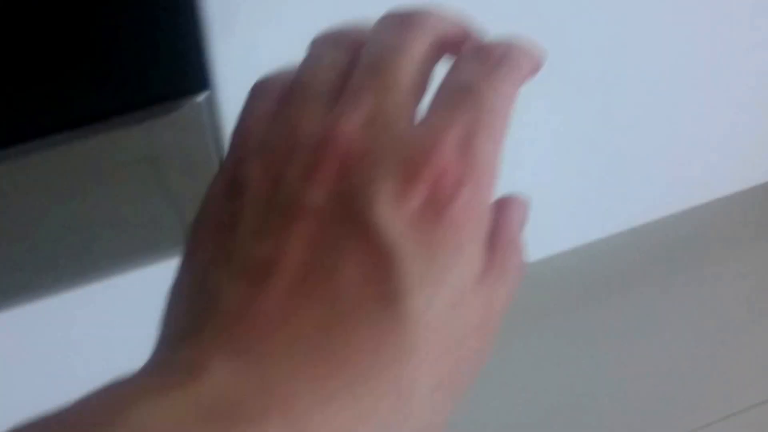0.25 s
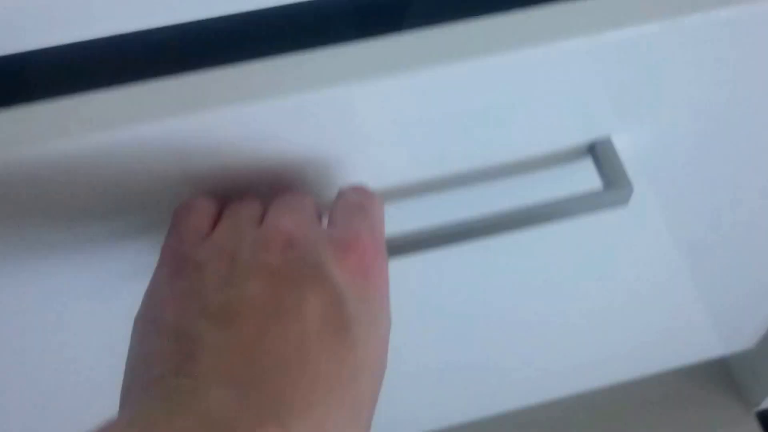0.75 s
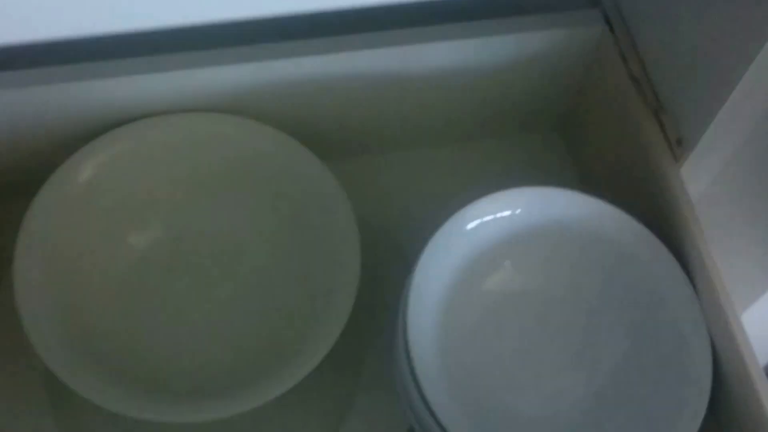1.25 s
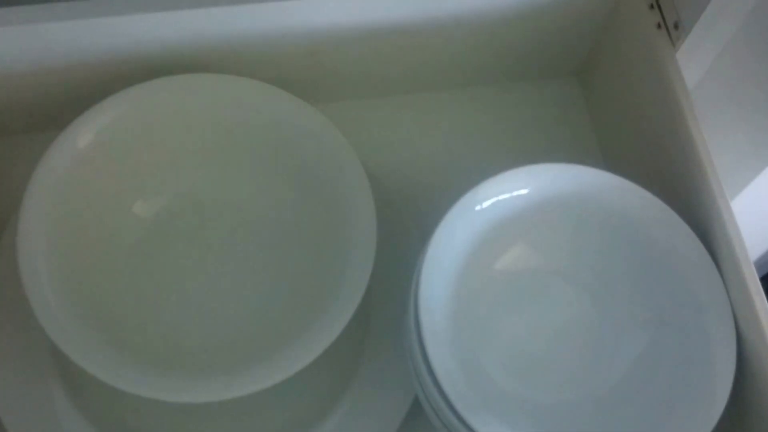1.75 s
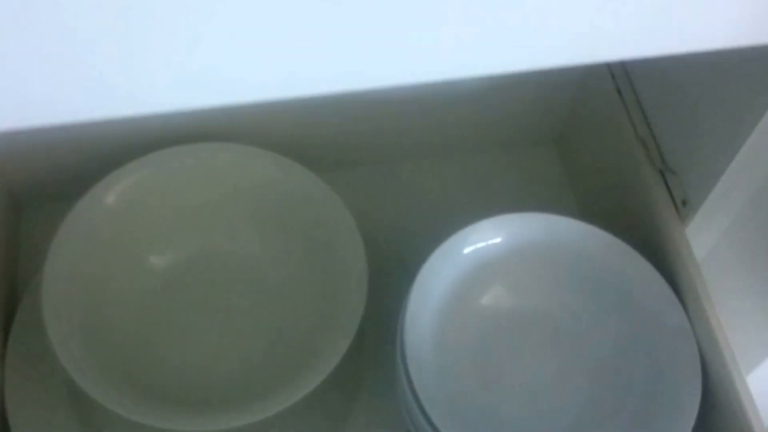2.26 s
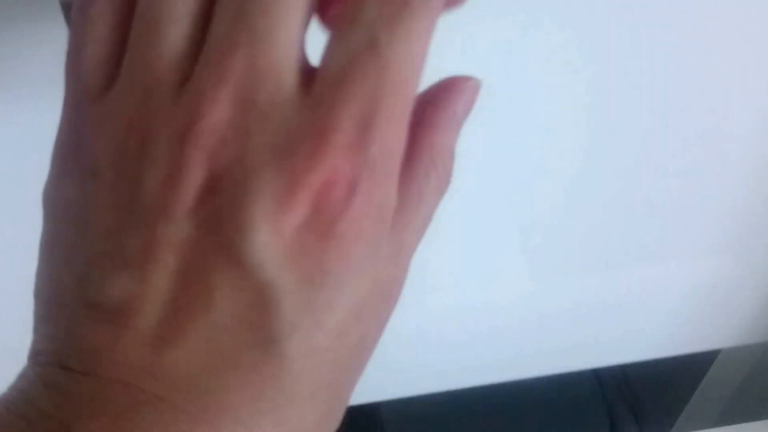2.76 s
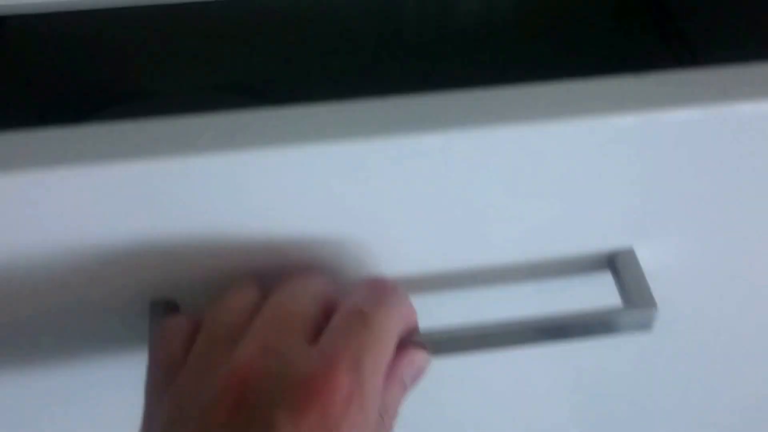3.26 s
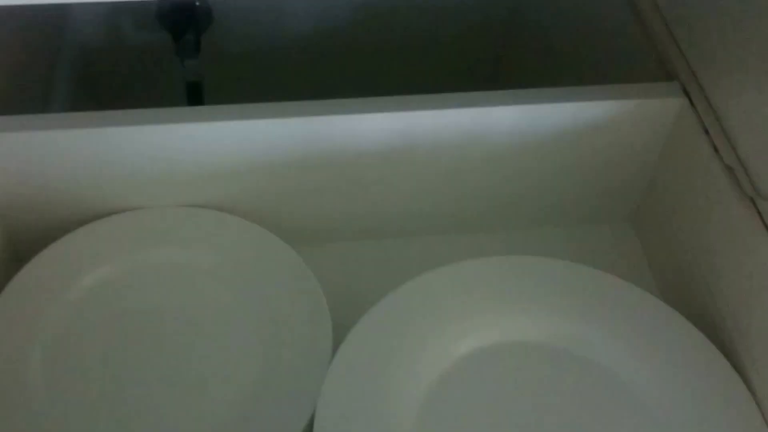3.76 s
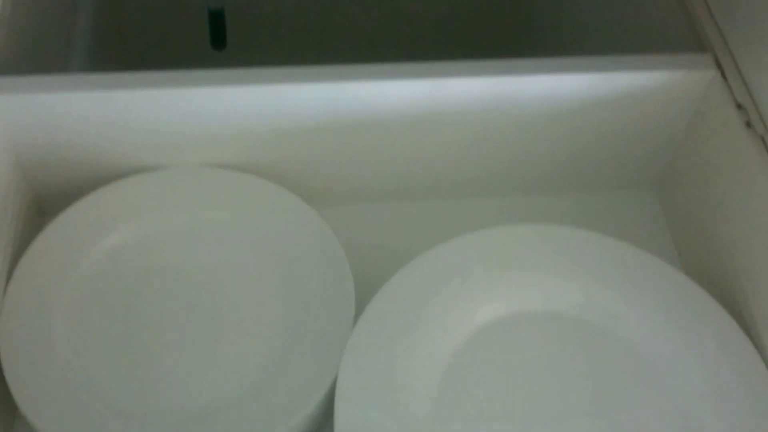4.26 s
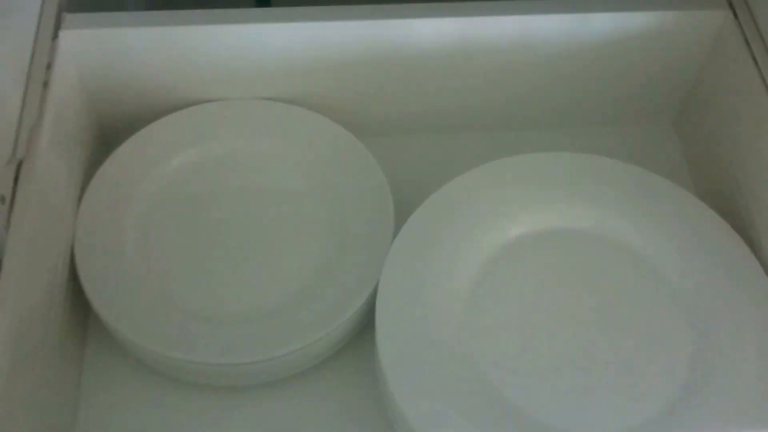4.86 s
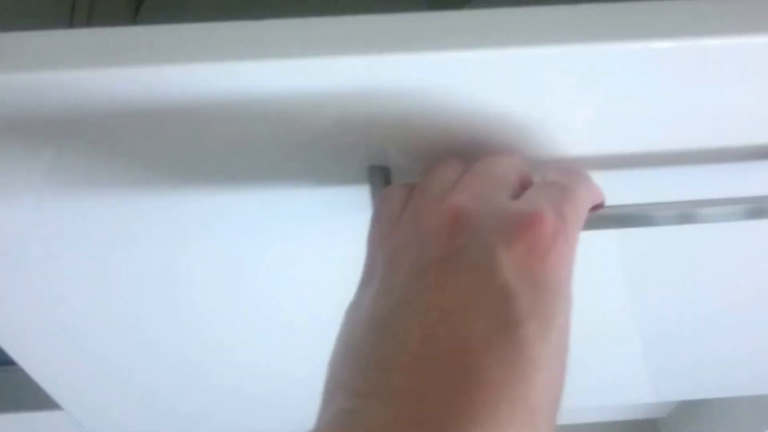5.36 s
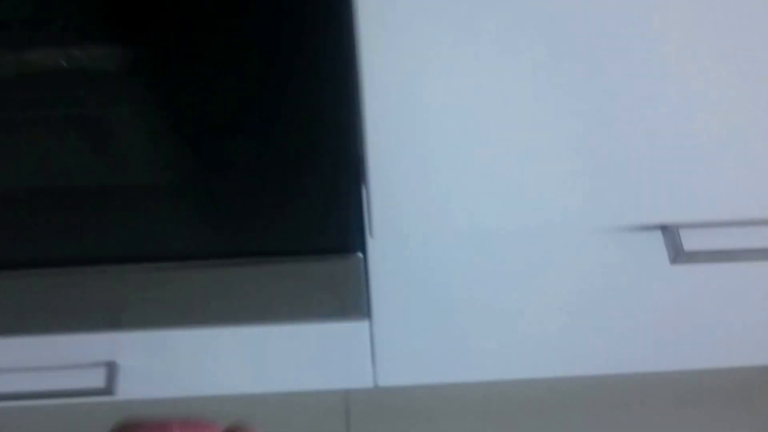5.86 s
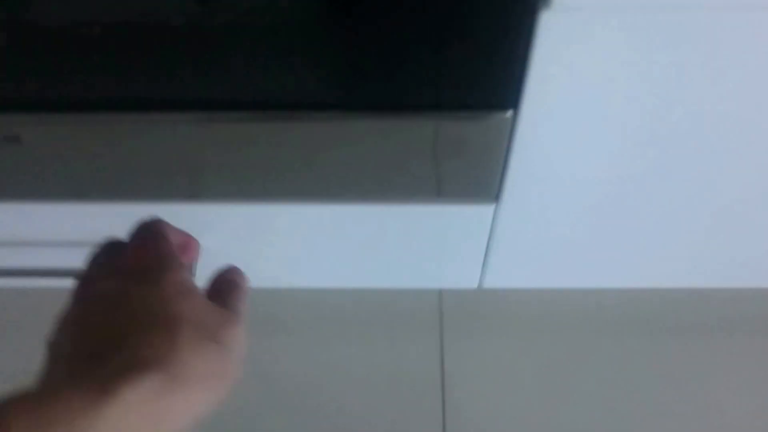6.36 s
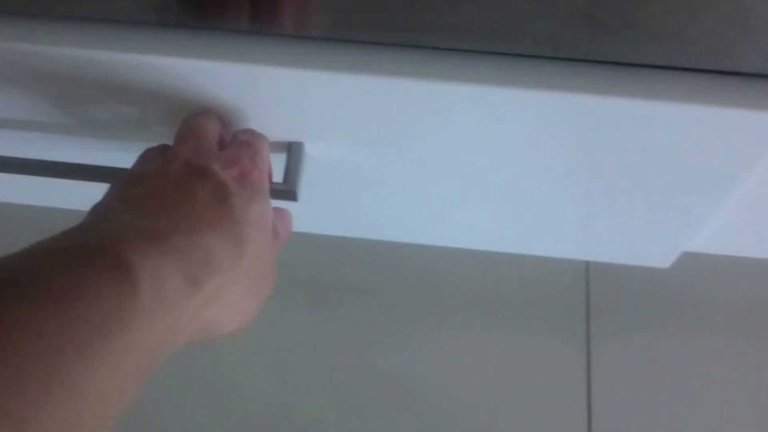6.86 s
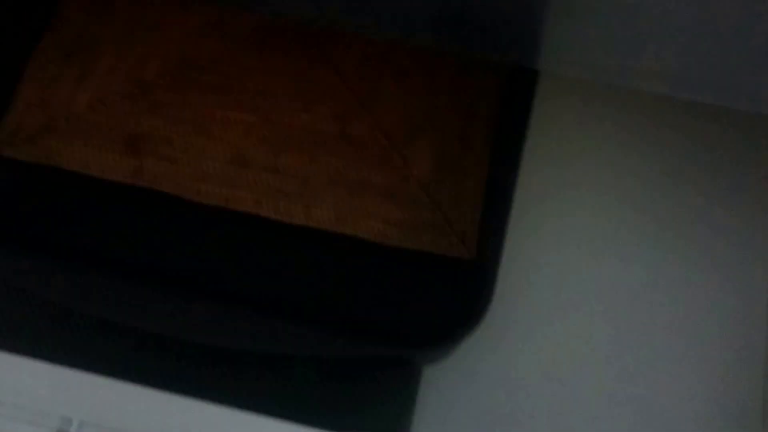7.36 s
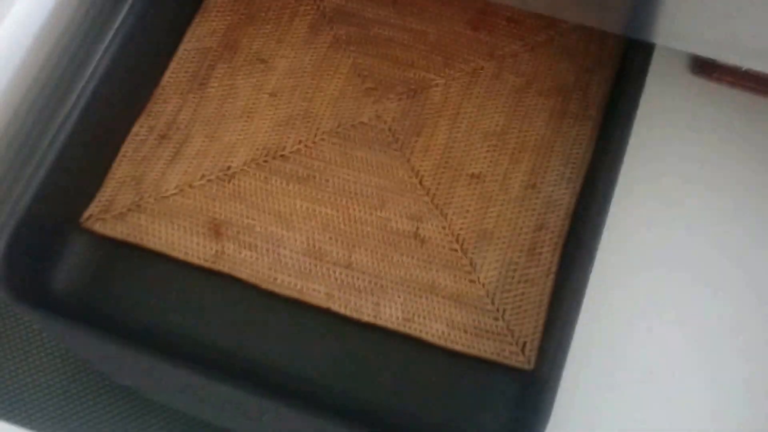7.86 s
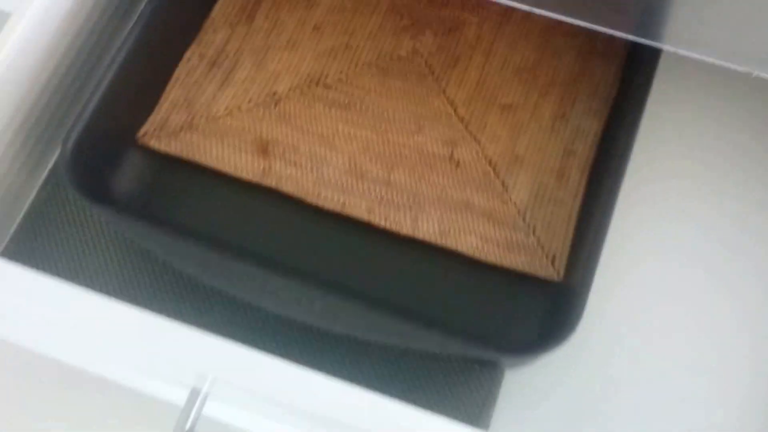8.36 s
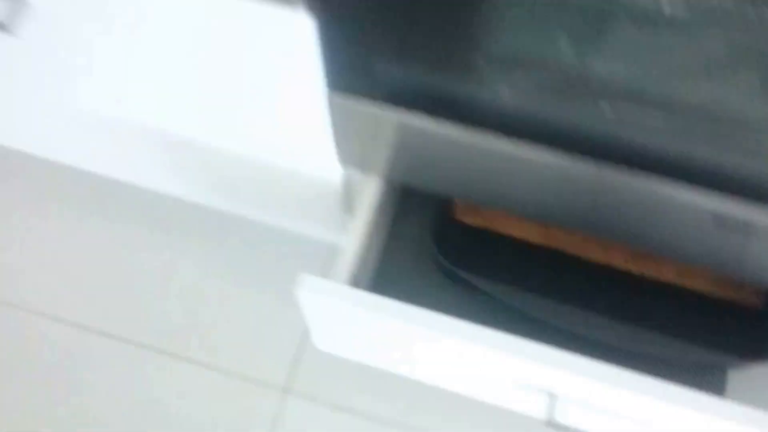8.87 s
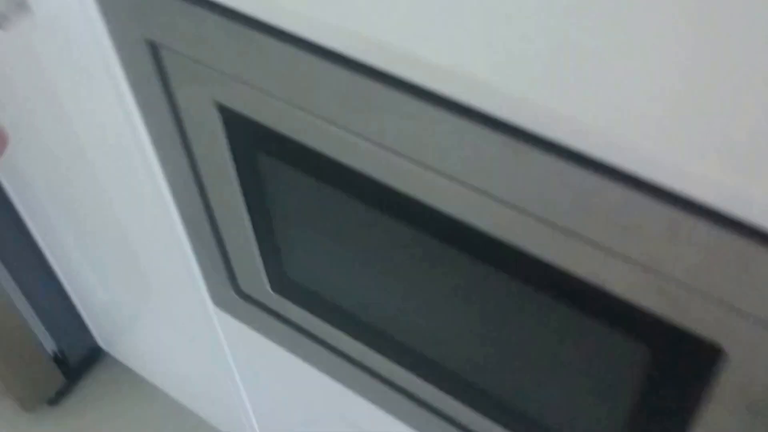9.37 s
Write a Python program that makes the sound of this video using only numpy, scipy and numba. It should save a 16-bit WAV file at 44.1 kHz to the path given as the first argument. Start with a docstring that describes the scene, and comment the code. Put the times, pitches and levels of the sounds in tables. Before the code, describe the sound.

Close, wide stereo pickup of drawers handled one by one: grinding rollers, hollow box rumble, wooden knocks and crockery chinks. Hard bangs fall at the start, near 1.6, 3.2, 6.2 and, less heavily, 9.5 seconds. Between them come softer rolling, clothing rustle and low handling puffs. The room is still, with bright short reverberation and distant fridge hum.

```python
"""From the start, room air and a far fridge hum lie under a drawer rolling on noise-excited resonances.
Blows follow at once, forces shaking modes of carcass, fronts and crockery; tones and a ringing bar join them.
Drawers go on rolling and banging, hardest near 0.1, 1.6, 3.2, 6.2 and 9.5 s; filtered noise rustles as clothes do.
Low puffs strike the microphones directly at 0.2, 2.6 and 9 s. The room is hard and quiet; its two close
microphones are widened, so the bass comes out in opposite phase, and bangs overload them."""
import sys
import numpy as np
from scipy import signal
from scipy.fft import rfft, irfft, next_fast_len
from scipy.io import wavfile
from numba import njit

SR = 44100
rng = np.random.default_rng(int(sys.argv[2]) if len(sys.argv) > 2 else 0)


def transcribe(signal):
    """Save signal, clipped to [-1, 1], as a 16-bit WAV file at the path in sys.argv[1]."""
    frames = np.atleast_2d(signal).T
    limited = np.clip(frames, -1, 1)
    pcm = np.round(limited * 32767).astype(np.int16)
    wavfile.write(sys.argv[1], SR, pcm)


N = 423801   # samples
PAD = next_fast_len(N + SR)   # room for a one-second tail
HZ = np.maximum(np.arange(PAD // 2 + 1) * SR / PAD, 1)

# Room air and far rumble: (frequency [Hz], relative density [dB per Hz])
AIR_SPECTRUM = [(30, -24), (48, -7), (69, -4), (120, -22.5), (182, -24.5), (292, -27.5), (606, -38),
                (2830, -42), (5000, -53.5), (6200, -49.5), (9000, -56.5), (15500, -72)]
AIR_DB = -52
# Sum against difference of the microphones for room air: (frequency [Hz], level [dB])
AIR_SUM_LEVEL = [(30, -18.5), (110, -10), (380, -6), (1300, -1), (15000, 6.5)]
# Fridge compressor: (multiple of the turning rate, level before wavering [dB rms])
HUM_PARTIALS = [(1, -65.5), (2, -68.5), (3, -69), (4, -73.5), (5, -77), (6, -85.5), (7, -86.5)]
HUM_HZ = 87.5   # mean turning rate

# Drawers rolling: (up to speed [s], slowing from [s], carcass rumble [dB], drawer box [dB],
#                   roller grind [dB], chinking load [dB], singing handle [dB], hollow note of the box [Hz])
SLIDES = [(0.0, 0.12, -32, -56.5, -50.5, -73, -72, 255), (0.92, 1.42, -36.5, -32.5, -41, -49.5, -46, 260),
          (2.2, 2.6, -47, -33, -49, -55, -46, 228), (2.75, 2.92, -36, -39, -49, -54.5, -51, 240),
          (3.6, 3.85, -45.5, -30.5, -44.5, -49, -60, 195), (4.98, 5.42, -39.5, -38.5, -50, -55.5, -61, 193),
          (5.55, 5.95, -47, -47, -58, -68, -70, 192), (6.549, 6.944, -51, -64, -67, -65.5, -68, 240),
          (7.15, 7.68, -36.5, -31.5, -47.5, -51.5, -72, 245),
          (7.9, 8.3, -66.5, -64, -66.5, -67.5, -70.5, 230),
          (8.42, 8.95, -43, -36.5, -53.5, -62.5, -73, 190),
          (9.05, 9.5, -41.5, -46.5, -55.5, -66, -70.5, 205)]
SPEED_UP_DB_PER_S, SLOW_DOWN_DB_PER_S = 108, 56
# Bangs jolting a drawer on its rails: (time [s], carcass rumble [dB], drawer box [dB],
#                                       roller grind [dB], chinking load [dB], rustle [dB])
JOLTS = [(0.24, -14.5, -26, -30.5, -50, -30.5), (1.65, -47.5, -19, -22.5, -23.5, -28.5),
         (3.2, -21.5, -20.5, -22, -32, -34.5), (6.248, -21.5, -33.5, -45, -41, -31),
         (9.579, -27.5, -29.5, -27, -38.5, -53.5)]
# Settling after a jolt: (rumble, box, grind, load, rustle [all dB per s])
SETTLE_RATES = (110, 60, 73, 70, 119)
JOLT_RISE_DB_PER_S, JOLT_HOLD_S = 499.5, 0.02
# Roller grind: (frequency [Hz], relative density [dB per Hz])
GRIND_SPECTRUM = [(450, 10), (700, 9.5), (1000, 8), (1300, 3), (1900, -3), (3000, -10), (4300, -23),
                  (6200, -20), (9000, -27), (15500, -57)]
# Handle bar singing while a drawer rolls: (frequency [Hz], relative level [dB], t60 [s])
BAR_MODES = [(440, -0.5, 0.7), (872, -1, .4)]
CHINKS_PER_S, CHINK_DAMPING, CHINK_SOFT_HZ = 120, .4, 2500   # damping multiplies the crockery's t60

# Clothes and skin: (full [s], fading from [s], level [dB])
RUSTLES = [(0.0, 0.098, -51.5), (0.507, 0.707, -61), (1.154, 1.206, -53), (2.383, 2.593, -56.5),
           (2.71, 2.743, -51), (3.573, 3.75, -57), (5.22, 5.336, -66), (5.74, 5.897, -68),
           (6.5, 6.864, -56.5), (7.042, 7.48, -61), (7.652, 7.662, -47.5), (8.38, 8.588, -55),
           (8.7, 8.93, -52.5), (9.262, 9.505, -52.5)]
RUSTLE_RISE_DB_PER_S, RUSTLE_FADE_DB_PER_S = 201.5, 106
# Rustle: (frequency [Hz], relative density [dB per Hz])
RUSTLE_SPECTRUM = [(1200, -12), (2500, 6), (5100, -4.5), (6000, 3.5), (8000, -4), (12000, -14),
                   (15500, -11)]

# Blows, levels relative: (time [s], carcass thud [dB], panel knock [dB], panel pitch struck [Hz], clatter [dB],
#                          clatter tilt to the treble [dB per band], shake length [s], left against right [dB])
BLOWS = [(0.03, -35, -58, 315, -56, -9.5, 0.0049, -8), (0.134, -14, -22, 772, -27, -1, 0.037, 3),
         (0.2058, -26.5, -25, 312, -27.5, -11, 0.0055, 9.5),
         (0.244, -27.5, -36, 759, -29.5, -3.5, 0.076, 3.5), (0.262, -27, -17.5, 594, -25, -7.5, 0.02, 5),
         (0.78, -37, -38, 304, -56, -4, 0.05, 5.5), (0.972, -34.5, -35, 297, -54, -5.5, 0.078, 1.5),
         (1.077, -35, -32.5, 284, -58, -10.5, 0.016, 1), (1.098, -37.5, -26.5, 250, -45.5, -6.5, 0.024, 0),
         (1.13, -31, -30, 282, -34, 3.5, 0.06, 1), (1.311, -43, -31, 318.5, -51.5, -11.5, 0.03, 2.5),
         (1.457, -51.5, -41, 310, -55, -11, 0.007, -4.5), (1.555, -53, -56.5, 300.2, -52, -2, 0.012, -0.5),
         (1.598, -18, -10, 248, -28, -3, 0.089, -0.5), (1.619, -27, -32, 294, -10.5, 1, 0.035, 3.5),
         (1.639, -38.5, -23, 263, -38, -3, 0.009, 4), (1.643, -41.5, -28, 560, -16, -3, 0.025, 2),
         (2.261, -37.5, -28.5, 250, -55.5, -17.5, 0.024, 0.5),
         (2.329, -54, -40.5, 247, -57, 8.5, 0.023, 0.5), (2.394, -48, -36.5, 232, -47.5, -7, 0.0049, 1),
         (2.408, -58, -43.5, 210, -47.5, -1, 0.042, 2), (2.463, -55, -36.5, 231, -44, -7.5, 0.023, -1.5),
         (2.554, -45, -37.5, 172, -43, -1, 0.022, -2), (2.623, -38.5, -33, 239, -47.5, -7.5, 0.013, 3),
         (2.671, -28, -29.5, 234, -33, 0.5, 0.044, 0.5), (3.0867, -48, -18.5, 537.5, -39, -15.5, 0.031, -1),
         (3.127, -36, -36, 354.2, -47.5, -11.5, 0.059, -3), (3.157, -12, -16, 395.2, -13, -5, 0.029, -0.5),
         (3.194, -25.5, -15, 770, -23.5, -12, 0.036, -0.5),
         (3.55, -50.5, -53.5, 179, -45.5, -1.5, 0.034, -1), (3.647, -34, -26, 185.3, -34, -1, 0.014, -0.5),
         (3.664, -50.5, -38.5, 211.3, -34.5, -4.5, 0.037, -2), (3.732, -45, -42, 187.7, -41, -8, 0.028, 1),
         (3.848, -59, -48, 238.4, -53, -7, 0.0125, -2), (3.92, -55.5, -54.5, 242, -59, 1, 0.0066, 3.5),
         (4.128, -47, -39, 237.7, -60, -10, 0.017, -0.5), (5.17, -52.5, -50.5, 192, -52, -3, 0.011, 1),
         (5.201, -33.5, -25.5, 192, -45.5, -6, 0.043, 0), (5.261, -46.5, -40.5, 193.4, -51.5, -1, 0.05, 2),
         (5.747, -58, -60, 192.6, -57.5, 1, 0.008, 1), (5.968, -40.5, -51, 176.6, -63.5, -10, 0.026, -4),
         (6.202, -30.5, -23, 362.4, -28, -7, 0.011, 8.5), (6.208, -8.5, -9, 363, -17.5, -6, 0.02, 0),
         (6.232, -26, -15, 230.1, -21.5, 2, 0.04, -1), (6.733, -58, -65.5, 174, -50.5, 1, 0.016, 2),
         (6.764, -45, -59.5, 172.3, -54, 14.5, 0.027, -3.5), (6.859, -58, -61, 172, -54, -1, 0.0075, -0.5),
         (7.061, -31.5, -47.5, 163, -54, -2.5, 0.029, -0.5),
         (7.32, -31.5, -40.5, 247, -51.5, -5, 0.026, -3), (7.598, -35, -27, 220, -38, -5.5, 0.0093, 1.5),
         (7.632, -43.5, -37, 216, -32.5, 8, 0.0096, 3), (7.665, -54.5, -54.5, 247, -35, 7.5, 0.0087, -1.5),
         (7.704, -33, -61.5, 220, -38.5, 3, 0.0067, 1), (7.972, -67, -39.5, 246, -61.5, 0, 0.017, 0),
         (8.192, -68, -66, 225, -60, -7, 0.021, 0), (8.359, -52.5, -69.5, 235, -55, 1, 0.046, -1.5),
         (8.396, -63, -78, 235, -51.5, 1, 0.014, 0), (8.577, -41.5, -37.5, 262, -48, -3, 0.012, 3),
         (8.648, -59, -33.5, 361.7, -32.5, 5, 0.019, 0.5), (8.676, -55, -36.5, 202, -38.5, 10, 0.015, -3.5),
         (8.78, -37.5, -72, 200, -51.5, 12, 0.0062, 0), (9.232, -49, -52.5, 173, -56, -1, 0.018, -7),
         (9.444, -54, -56, 178, -62, 25, 0.0061, 7.5), (9.534, -29.5, -30, 310, -30, 1, 0.016, 3),
         (9.565, -29.5, -28, 419.7, -35, -4, 0.0125, -3)]
# Carcass modes: (frequency [Hz], relative level [dB], t60 when struck [s])
CARCASS_MODES = [(60, -1, 0.062), (77.4, -8, 0.14), (92, -7, 0.26), (88, 6.5, 0.12), (108.3, 0.5, 0.27),
                 (138, -1, 0.34)]
# Fronts and sides: (frequency [Hz], relative level [dB], t60 when struck [s])
PANEL_MODES = [(181.5, 4.5, 0.26), (220, 0.5, 0.077), (266, -5.5, 0.33), (305, 0, 0.052), (353, 4, 0.053),
               (397, -3, 0.08), (466.6, 3.5, 0.065), (546, -2.5, 0.085), (607, 2.5, 0.11), (728, -9, 0.057),
               (773.3, -2.5, 0.22), (825, -0.5, 0.064)]
# Bowls, plates and trays: (frequency [Hz], relative level [dB], t60 when struck [s])
CROCKERY_MODES = [(1014, -9.5, 0.33), (1154, -17.5, 0.41), (1299, -15.5, .06), (1468, -9.5, .2),
                  (2055, -10.5, 0.23), (1550, -11.5, 0.03), (1730, -3, 0.14), (1773, 0.5, 0.044),
                  (2175, -2, 0.081), (2064, -2, .09), (2347, -0.5, 0.014), (2466, -10, 0.18),
                  (3256, -13, 0.17), (3663, -1, 0.078), (4260, -20.5, 0.022), (4500, -19, 0.049),
                  (4717, -7.5, 0.16), (5840, -15.5, 0.052), (6228, -5.5, .05), (6530, -4, 0.18),
                  (6530, -15, 0.02), (8080, -16, 0.11)]
# Direct crack of a contact: (frequency [Hz], relative density [dB per Hz])
CRACK_SPECTRUM = [(500, -5.5), (800, 0.5), (1300, 1.5), (2100, -4), (2800, 3.5), (4500, -5), (5400, -8),
                  (6400, 0.5), (9000, -12), (12000, -20.5), (15500, -25.5)]
THUD_HZ = 110   # where the carcass is shoved
FIRST_CRACK, CRACK_S = 1.1, .0015   # first contact against the later chatter, and its decay time

# Short held tones: (time [s], length [s], frequency [Hz], level [dB], left against right [dB])
HELD_TONES = [(0.136, 0.052, 963, -19, 4), (0.136, 0.015, 725, -27.5, -12), (0.268, 0.023, 1793, -28, -12),
              (0.269, 0.033, 960, -18, 6), (0.779, 0.025, 320, -25.5, 1.5), (1.634, 0.011, 2134, -12.5, 1),
              (3.0876, 0.026, 536.4, -14, -6.5), (3.097, 0.026, 368, -22, -11.5),
              (3.128, 0.024, 362, -20.5, -6.5)]
TONE_EDGE_S = .005
# Puffs of air or grip on the microphones: (time [s], relative level [dB], frequency [Hz])
PUFFS = [(0.207, -24, 92), (2.537, -21.5, 84.5), (2.588, -29, 80.6), (2.617, -28, 71.6), (2.66, -24, 84),
         (9.041, -35, 92.4), (9.085, -35, 64.4), (9.195, -38.5, 80), (9.543, -30, 72)]
# A bar left ringing: (time [s], frequency [Hz], level [dB], t60 [s])
HANDLE_PARTIALS = [(0.272, 220, -29, 1.6), (0.268, 466.6, -39, 3.4), (0.27, 1061, -43.5, 0.42),
                   (0.27, 1314, -28, 0.68)]

# Reverberation: (frequency [Hz], t60 [s])
ROOM_T60 = [(60, 0.088), (250, 0.18), (700, 0.66), (2000, 0.69), (5000, 0.69), (11000, 0.11)]
ROOM_DB = -8
# Sum against difference of the microphones: (frequency [Hz], level [dB])
SUM_LEVEL = [(30, -25), (60, -19.5), (200, -24.5), (380, -11.5), (700, -14.5), (1290, -5.5), (2400, -0.6),
             (15000, -2.8)]
# The hand shades the left port: (frequency [Hz], level [dB])
LEFT_SHADE = [(250, -0.13), (500, -0.94), (1000, -3), (2000, -3.5), (8000, -3.5), (14000, -1)]
CUTOFF_HZ = 16000


def from_db(db):
    """Logarithmic level: the gain of a level in dB."""
    return 10 ** (np.asarray(db) / 20)


def rms_one(x):
    """Normalisation: a signal scaled to rms 1."""
    return x / np.sqrt(np.mean(x ** 2) + 1e-20)


def at_hz(points, hz):
    """Interpolation: a spectrum table read on a log-frequency axis."""
    table = np.array(points)
    return np.interp(np.log(hz), np.log(table[:, 0]), table[:, 1])


def colour(x, points):
    """Linear filtering through a spectrum, scaled so that white noise keeps its rms."""
    octaves_below = np.maximum(np.log2(points[0][0] / HZ), 0)
    gain = from_db(at_hz(points, HZ) - 24 * octaves_below)
    return irfft(rfft(x, PAD) * rms_one(gain), PAD)[..., :N]


def ring(x, hz, t60):
    """Damped resonance: one mode, which passes white noise of rms 1 at rms 1."""
    r = from_db(-60 / (np.clip(t60, .005, 3) * SR))
    w = 2 * np.pi * hz / SR
    return signal.lfilter([0, np.sin(w) * 2 * np.sqrt(1 - r)], [1, -2 * r * np.cos(w), r * r], x + 1e-18)


@njit
def moving_ring(x, hz, r):
    """Time-varying resonance: its centre (cycles a sample) moves."""
    y = np.zeros(len(x))
    for i in range(2, len(x)):
        y[i] = x[i] + 2 * r * np.cos(2 * np.pi * hz[i]) * y[i - 1] - r * r * y[i - 2]
    return y


def grains(per_s, spread_db):
    """Random impulse process: contacts of uneven size and either sign, rms 1."""
    sizes = from_db(spread_db * np.minimum(rng.exponential(1, N), 4)) * rng.choice([-1, 1], N)
    return rms_one(sizes * (rng.random(N) < per_s / SR))


def drift(rate):
    """Low-passed noise: slow random wandering of spread 1."""
    r = np.exp(-2 * np.pi * rate / SR)
    slow = signal.lfilter([1], [1, -2 * r, r * r], rng.standard_normal(N + SR))
    return rms_one(slow[SR:])


def sides(pan_db):
    """Level difference between the ears: left and right gains."""
    return from_db([[pan_db / 2], [-pan_db / 2]])


def swell(start, stop, db, rise_db_per_s, fade_db_per_s):
    """Addition of powers: gain of events that rise, hold from start to stop and fade."""
    t = np.arange(0, N, 32)[:, None] / SR
    rise_db = rise_db_per_s * np.maximum(start - t, 0)
    fade_db = fade_db_per_s * np.maximum(t - stop, 0)
    power = np.sum(from_db(2 * (db - rise_db - fade_db)), axis=1)
    return np.interp(np.arange(N) / SR, t[:, 0], np.sqrt(power))


def shake(s, length, rise):
    """Transient force: a quick start, falling to 1/e after the shake length."""
    start = round(s * SR)
    t = np.arange(min(N - start, SR // 3)) / SR
    length = np.clip(length, .002, .15)
    return slice(start, start + len(t)), np.minimum(t / rise, 1) * np.exp(-(t / length) ** 1.5)


def struck(modes, force, hz, narrow_db, far_db):
    """Modal excitation: modes near the place struck speak loudest, neighbours in opposite sense."""
    out = 0
    for k, (mode_hz, db, t60) in enumerate(modes):
        near_db = -min(narrow_db * abs(np.log2(mode_hz / hz)), far_db)
        impulse_gain = np.sqrt(t60 * SR / (12 * np.log(10)))   # undoes the noise scaling of ring()
        out = out + (-1) ** k * from_db(db + near_db) * impulse_gain * ring(force, mode_hz, t60)
    return out


def room_tone():
    """Stationary noise with a harmonic series: air, far rumble and the slightly wavering fridge."""
    mid, side = colour(rng.standard_normal((2, N)), AIR_SPECTRUM)
    hz = np.maximum(np.arange(N // 2 + 1) * SR / N, 1)
    mid = irfft(rfft(mid) * from_db(at_hz(AIR_SUM_LEVEL, hz)), N)
    turn = 2 * np.pi * HUM_HZ * np.cumsum(1 + 0.0084 * drift(1)) / SR
    # partials locked in phase make one pulse each turn
    pulses = sum(np.sqrt(2) * from_db(db) * np.sin(k * (turn + 1.0)) for k, db in HUM_PARTIALS)
    hum = from_db(1.5 * drift(5.9)) * pulses
    return from_db(AIR_DB) * (mid + side * np.array([[1], [-1]])) + hum * sides(3.0)


def slide_gain(part):
    """Envelope of rolling: one part swells with speed and fades with slowing."""
    start, stop, db = np.transpose(SLIDES)[[0, 1, part + 2]]
    return swell(start, stop, db, SPEED_UP_DB_PER_S, SLOW_DOWN_DB_PER_S)


def jolt_gain(part):
    """Impulsive disturbance: a bang jolts one part, which then settles."""
    bang, db = np.transpose(JOLTS)[[0, part + 1]]
    return swell(bang, bang + JOLT_HOLD_S, db, JOLT_RISE_DB_PER_S, SETTLE_RATES[part])


def carcass_rumble(bumps):
    """Forced vibration: rail bumps drive the low modes of the carcass."""
    rumble = sum(from_db(db) * ring(bumps, hz, 0.47 * t60) for hz, db, t60 in CARCASS_MODES)
    high_pass = signal.butter(4, 48, "high", fs=SR, output="sos")
    return rms_one(signal.sosfilt(high_pass, rumble))


def drawer_box(bumps):
    """Cavity and plate resonance: a hollow note gliding from slide to slide, and the panels."""
    start, stop, note_hz = np.transpose(SLIDES)[[0, 1, 7]]
    hz = np.interp(np.arange(N) / SR, (start + stop) / 2, note_hz)
    note = rms_one(moving_ring(bumps, hz / SR, np.exp(-np.pi * 35 / SR)))   # 35 Hz wide
    panels = rms_one(sum(ring(bumps, hz, .5 * t60) * (200 / hz) ** 1.3 for hz, _, t60 in PANEL_MODES))
    return rms_one(note + from_db(-1) * panels)


def roller_grind():
    """Rolling friction: contacts common to both sides, with noise of each side, unsteady in level."""
    rough = grains(1500, spread_db=-2.0) + 0.66 * rng.standard_normal((2, N))
    return colour(rough * from_db(1.2 * drift(22)), GRIND_SPECTRUM)


def chinking_load():
    """Damped modes: softened random contacts ring the crockery in the drawer."""
    chinks = signal.lfilter(*signal.butter(2, CHINK_SOFT_HZ, fs=SR), grains(CHINKS_PER_S, spread_db=3.5))
    return rms_one(sum(from_db(db) * ring(chinks, hz, CHINK_DAMPING * t60) for hz, db, t60 in CROCKERY_MODES))


def runners():
    """Common excitation: rollers bump along the rails and set carcass, box and handle going."""
    bumps = grains(1500, spread_db=3.5) * from_db(1.6 * drift(11))
    parts = [carcass_rumble(bumps), drawer_box(bumps), roller_grind(), chinking_load()]
    moving = sum(np.hypot(slide_gain(k), jolt_gain(k)) * part for k, part in enumerate(parts))
    bar = sum(from_db(db) * ring(bumps, hz, t60) for hz, db, t60 in BAR_MODES)
    return moving + slide_gain(4) * bar


def rustles():
    """Friction noise: clothes and skin rustle, and each jolt adds its own."""
    cloth = swell(*np.transpose(RUSTLES), RUSTLE_RISE_DB_PER_S, RUSTLE_FADE_DB_PER_S)
    noise = colour(rng.standard_normal((2, N)) * from_db(2.4 * drift(40)), RUSTLE_SPECTRUM)
    return np.hypot(cloth, jolt_gain(4)) * noise


def bodies(clatter):
    """Modal response: the clatter bands ring crockery, rattle the higher panels and crack directly."""
    edges = [(400, 1800), (1800, 5000), (5000, 19000)]   # Hz
    contact = 0
    for db, edge, band in zip((12, 9, 7), edges, clatter):
        band_pass = signal.butter(4, edge, "band", fs=SR, output="sos")
        contact = contact + from_db(db) * signal.sosfilt(band_pass, band)
    rings = sum(from_db(db - 25.0) * ring(contact, hz, t60) * (-1) ** k
                for k, (hz, db, t60) in enumerate(CROCKERY_MODES))
    rattle = sum(from_db(db - 17.0) * ring(clatter[0], hz, t60) * (-1) ** k
                 for k, (hz, db, t60) in enumerate(PANEL_MODES[6:]))
    return rattle + rings + from_db(-8.0) * colour(contact, CRACK_SPECTRUM)


def blows():
    """Impact: every blow drives the same bodies; parts keep bouncing while the shake lasts."""
    bounce, shared = grains(780, spread_db=8.0), grains(3000, spread_db=0.5)
    chatter = shared + 0.87 * np.array([grains(3000, spread_db=4.0), grains(3000, spread_db=6.5)])
    splinter = rng.standard_normal(N)
    wood, clatter = np.zeros((2, N)), np.zeros((3, 2, N))   # clatter: bands, sides, samples
    for s, thud_db, knock_db, knock_hz, clatter_db, tilt_db, length, pan_db in BLOWS:
        at, force = shake(s, length, rise=0.00079)
        t = np.arange(len(force)) / SR
        # the weight follows as a soft shove
        push = np.exp(-((t - .006) / .002) ** 2) / (0.0017 * SR * np.sqrt(np.pi))
        wood[:, at] += from_db(thud_db + 9) * struck(CARCASS_MODES, push, THUD_HZ, narrow_db=48.0, far_db=26)
        taps = 0.014 * force * bounce[at]
        taps[20:24] += .25   # first contact
        knock = struck(PANEL_MODES, taps, knock_hz, narrow_db=58.5, far_db=14.5)
        wood[:, at] += from_db(knock_db + 7.5) * sides(pan_db) * knock
        crack = FIRST_CRACK * np.exp(-t / CRACK_S) * splinter[at]
        band_gain = from_db(clatter_db + tilt_db * np.arange(-1, 2))[:, None, None]
        clatter[:, :, at] += band_gain * sides(pan_db) * (force * chatter[:, at] + crack)
    return wood + bodies(clatter)


def tones():
    """Sustained vibration as a hand grips or a front flexes: an unsteady sine with soft edges."""
    out, t, waver = np.zeros((2, N)), np.arange(N) / SR, from_db(2.0 * drift(40))
    for s, length, hz, db, pan_db in HELD_TONES:
        at = slice(round(s * SR), round((s + length + 4 * TONE_EDGE_S) * SR))
        age = t[at] - s
        shape = np.minimum(age / TONE_EDGE_S, 1) * np.exp(-np.maximum(age - length, 0) / TONE_EDGE_S)
        out[:, at] += from_db(db) * sides(pan_db) * shape * waver[at] * np.sin(2 * np.pi * hz * age)
    return out


def puffs():
    """Pressure pulses: a few low cycles, alike in both channels but stronger on the left."""
    out = np.zeros(N)
    for s, db, hz in PUFFS:
        at, force = shake(s, 0.019, rise=0.0046)
        out[at] += from_db(db) * force * np.sin(2 * np.pi * hz * np.arange(len(force)) / SR)
    return out * np.array([[1.6], [.4]])


def handle():
    """Free decay: long clean partials of a bar left ringing after the first bang."""
    t, out = np.arange(N) / SR, 0
    for s, hz, db, t60 in HANDLE_PARTIALS:
        decay = from_db(db - 60 * np.maximum(t - s, 0) / t60)
        out = out + (t > s) * decay * np.sin(2 * np.pi * hz * t)
    return out


def kitchen(x):
    """Reverberation: direct sound and a tail dying band by band, as microphone sum and difference."""
    t, tail = np.arange(SR) / SR, 0
    white = rng.standard_normal((2, 2, SR))
    for k, low in enumerate(30 * 2 ** np.arange(0, 9, .5)):   # half-octave bands
        band_pass = signal.butter(2, [low, low * np.sqrt(2)], "band", fs=SR, output="sos")
        band = signal.sosfilt(band_pass, white[k % 2])
        t60 = at_hz(ROOM_T60, low * 1.4)
        tail = tail + band * from_db(-60 * t / t60) / np.sqrt(SR * .07)
    tail = from_db(ROOM_DB) * rfft(tail * np.minimum(t / 0.013, 1), PAD)
    quarter = -1j   # the sum of two close ports runs a quarter cycle behind their difference
    mid = (quarter + tail[0]) * from_db(at_hz(SUM_LEVEL, HZ))
    side = 1 + tail[1]
    left = (mid + side) * from_db(at_hz(LEFT_SHADE, HZ))
    return irfft(rfft(x, PAD) * [left, mid - side], PAD)[:, :N]


def scene():
    """Superposition: sources in the room, with what acts on the microphones directly."""
    sources = runners() + rustles() + blows() + tones() + handle()
    return room_tone() + kitchen(sources) + puffs()


def record(dry):
    """Saturation and band limiting: bangs flatten towards a ceiling, the top is cut."""
    ceiling = 0.95   # of full scale
    flat = dry / (1 + np.abs(dry / ceiling) ** 4) ** .25
    return signal.sosfilt(signal.cheby2(12, 50, CUTOFF_HZ, fs=SR, output="sos"), flat)


dry = scene()
out = record(dry)
transcribe(out)
```